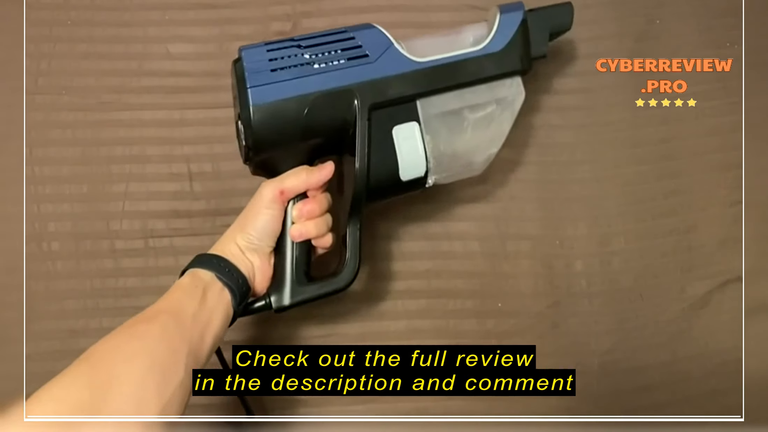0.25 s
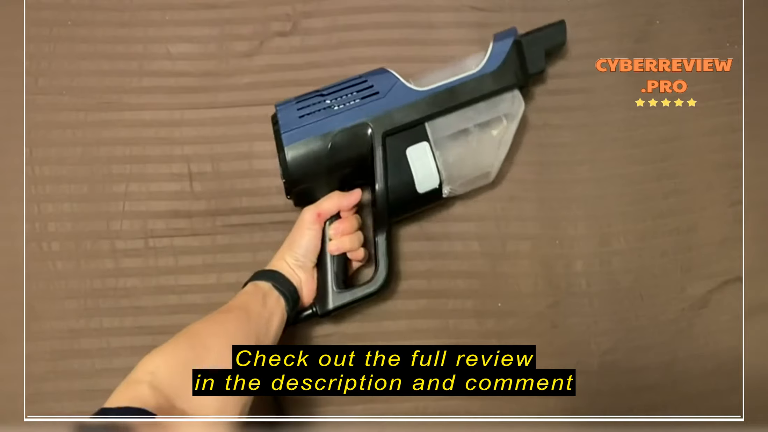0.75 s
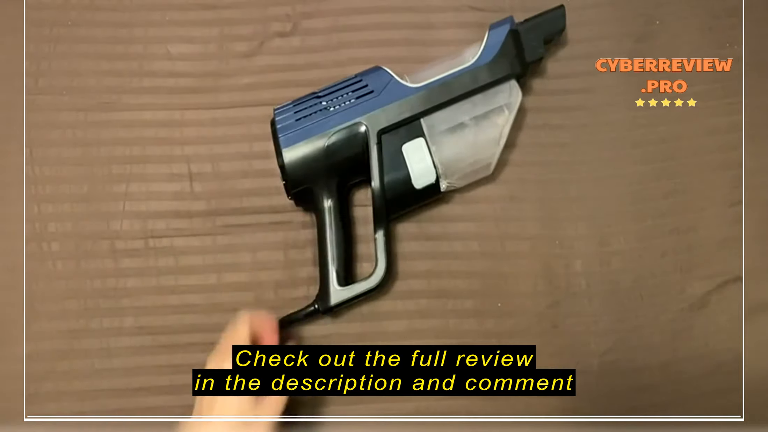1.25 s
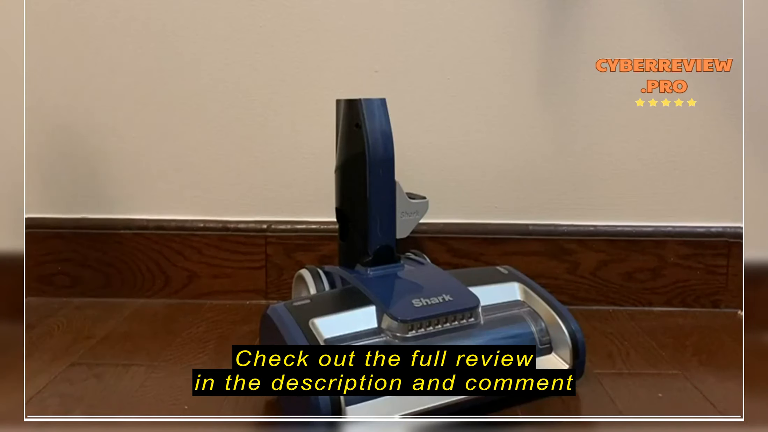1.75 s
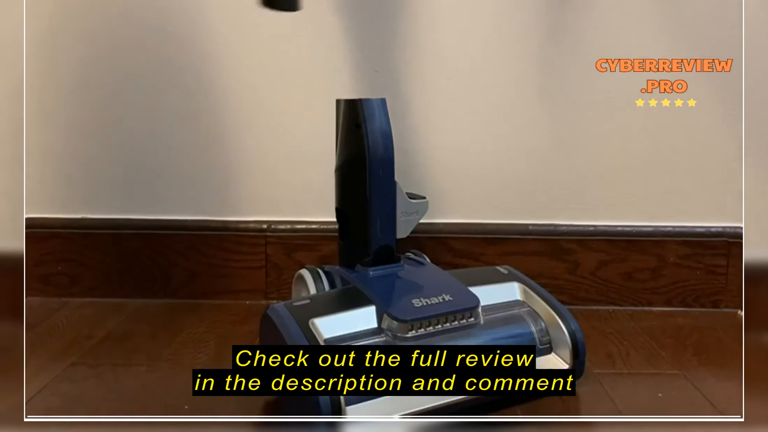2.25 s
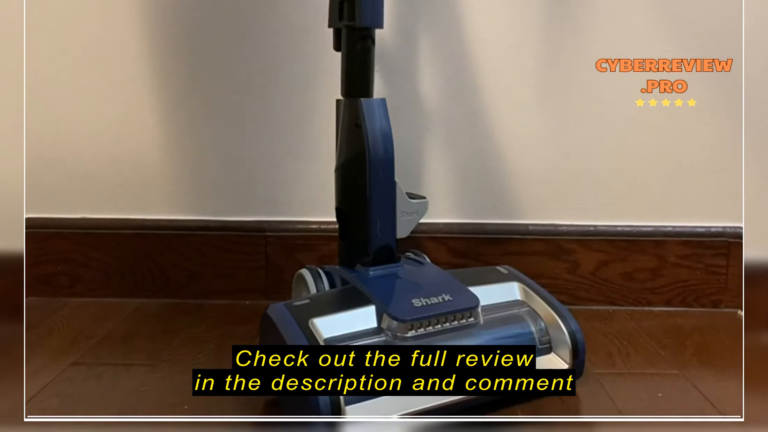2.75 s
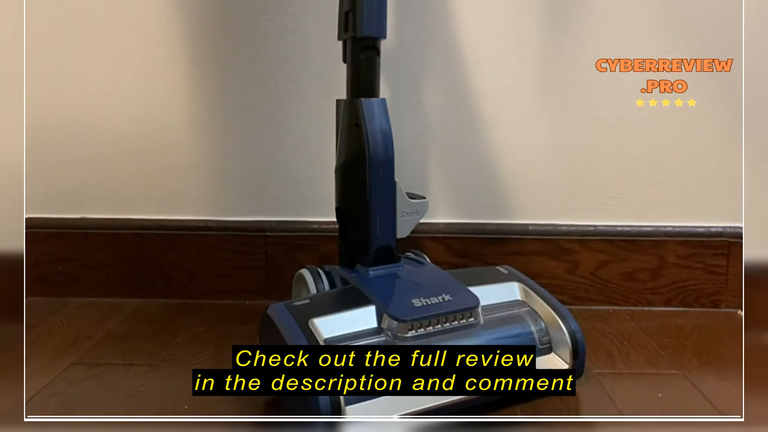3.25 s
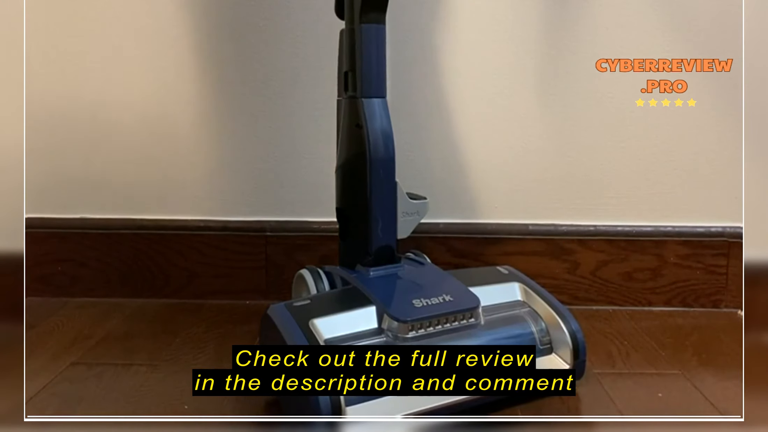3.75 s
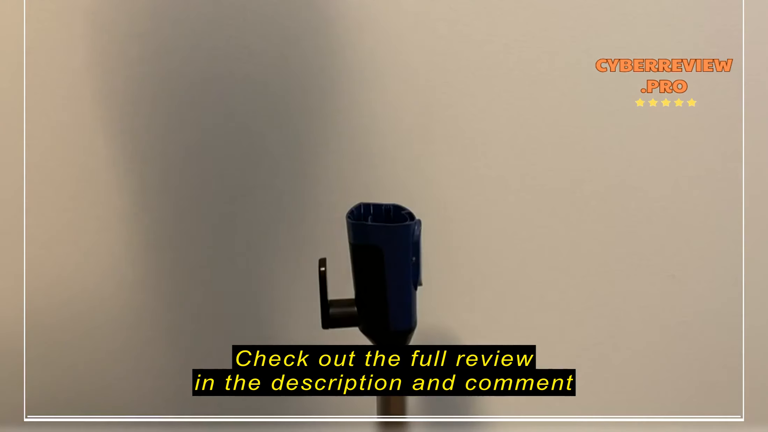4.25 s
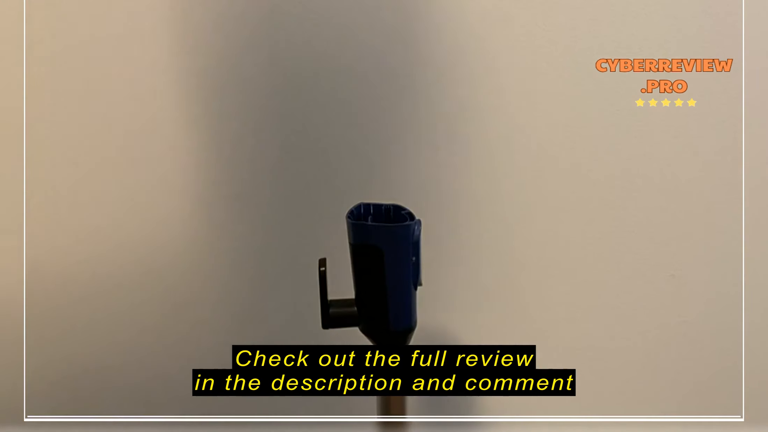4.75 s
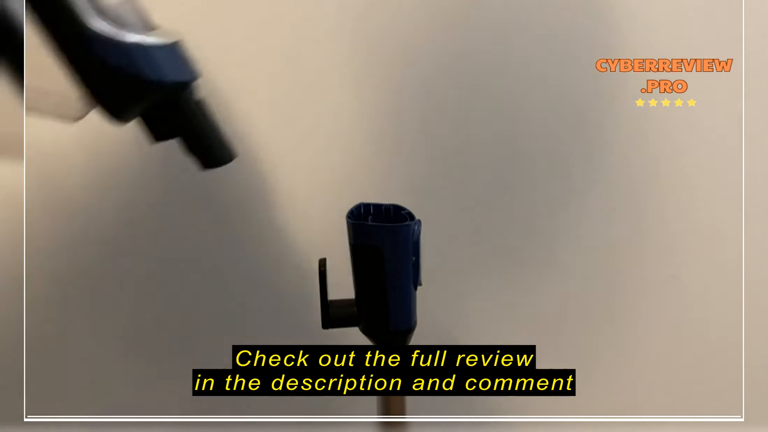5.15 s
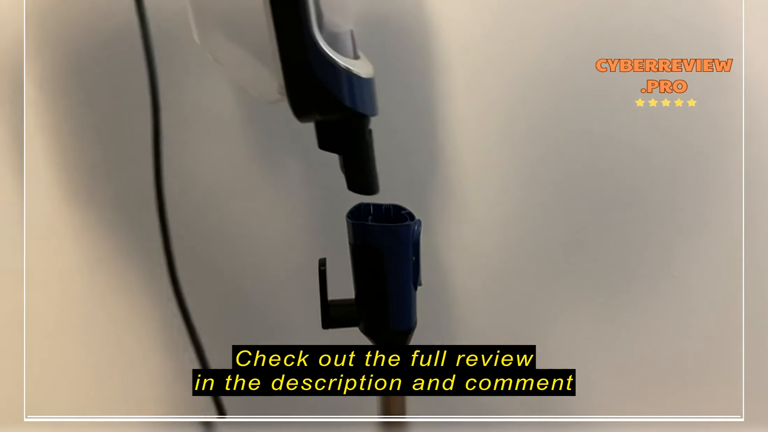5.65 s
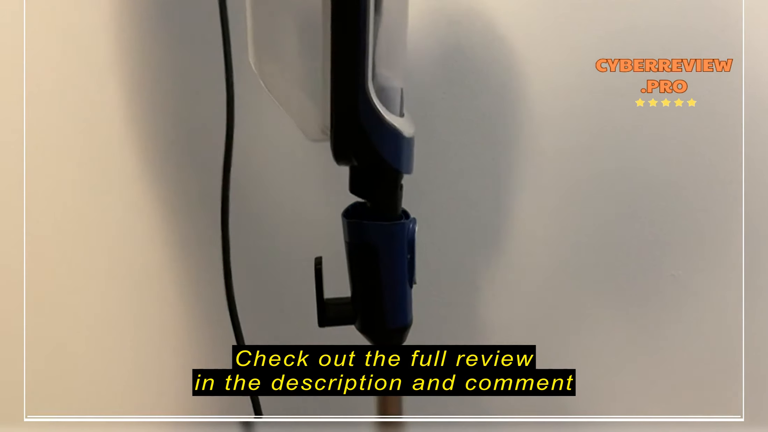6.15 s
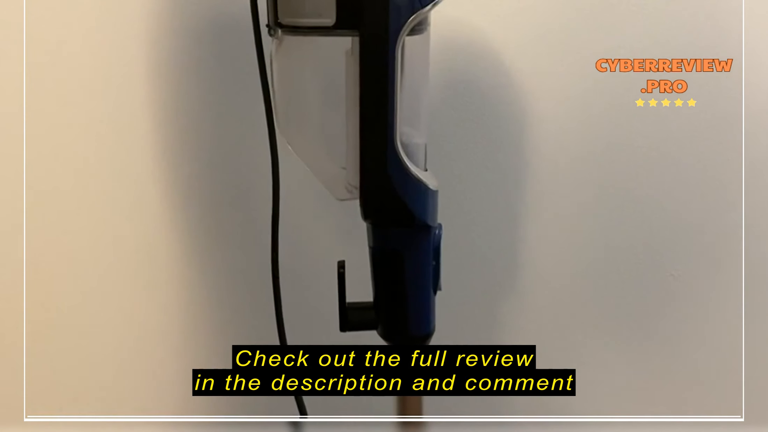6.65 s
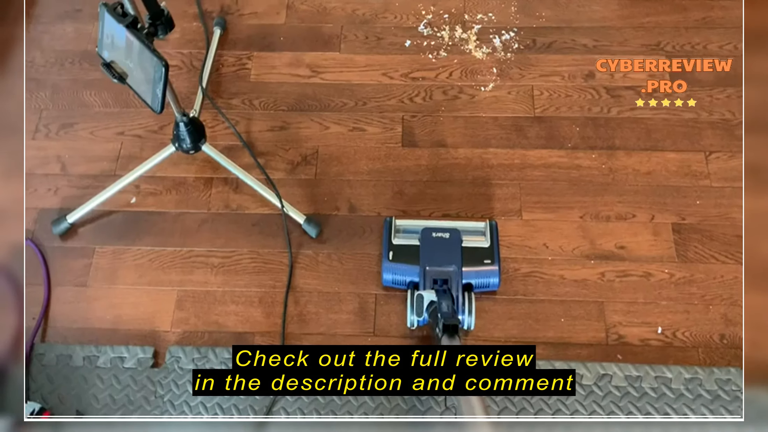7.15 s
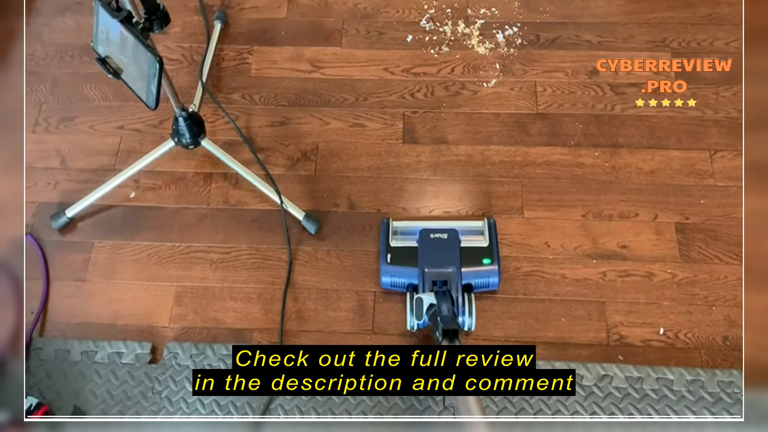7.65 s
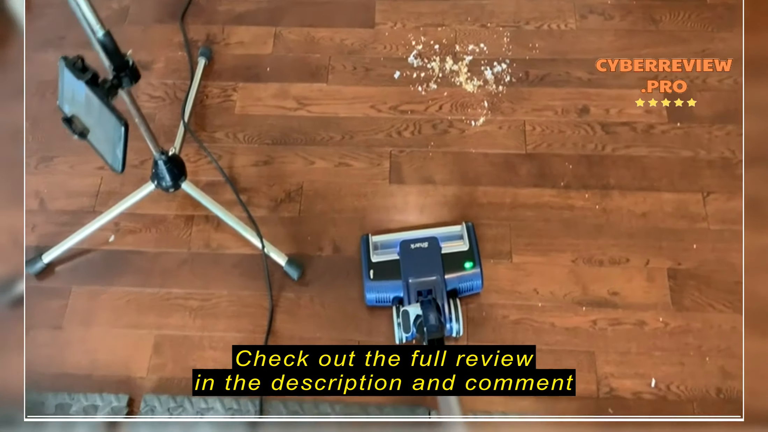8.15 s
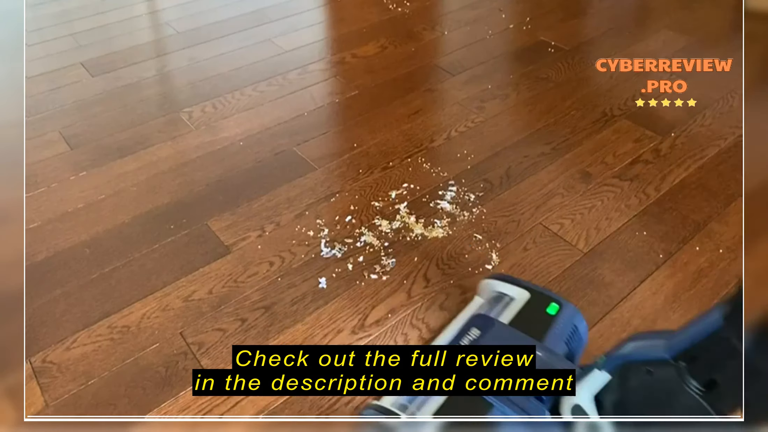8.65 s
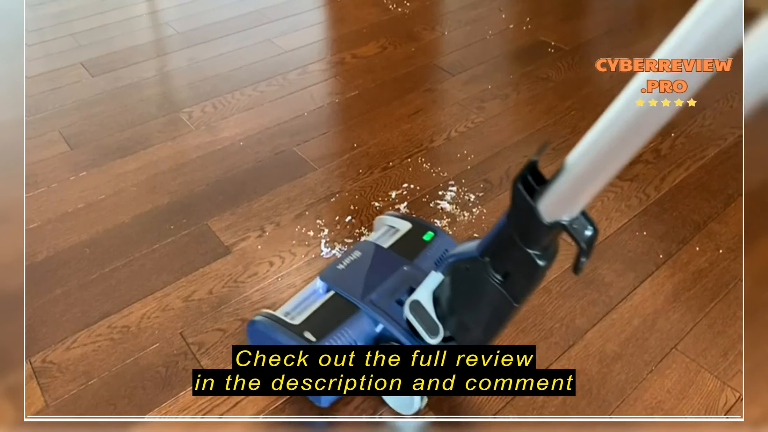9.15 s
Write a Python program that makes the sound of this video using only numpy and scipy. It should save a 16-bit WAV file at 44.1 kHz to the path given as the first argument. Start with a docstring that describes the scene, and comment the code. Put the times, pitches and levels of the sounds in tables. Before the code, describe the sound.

A small vacuum cleaner runs close to a stereo microphone in a hard-floored room, a steady airy roar with a thin whine. The switch clicks twice, and the motor glides down in pitch over a couple of seconds with rough brush noise. After faint rumbles and hand swishes, plastic parts clatter in two quick clusters, a piece bumps the floor, and a bright latch snap drags off into a short scrape.

```python
"""A hard-floored room, heard close up by a pair of microphone ports: a hand-held vacuum cleaner
runs, is switched off and coasts down. Its shaft gives sine tones, its fan noise through ducts,
its brushes noise through the housing. Then come low rumbles, hand swishes (swelling noise), narrow
noise swells, and plastic parts knocked and latched (cracks, ringing modes) with a room tail and hum."""
import sys
import numpy as np
from scipy import signal
from scipy.fft import rfft, irfft, next_fast_len
from scipy.io import wavfile
from scipy.ndimage import uniform_filter1d

SR = 44100
rng = np.random.default_rng(int(sys.argv[2]) if len(sys.argv) > 2 else 0)


def dump(signal):
    """Clip the signal to [-1, 1] and save it as 16-bit WAV at the path in sys.argv[1]."""
    limited = np.clip(np.atleast_2d(signal).T, -1, 1)
    pcm = np.round(limited * 32767).astype(np.int16)
    wavfile.write(sys.argv[1], SR, pcm)


N = 414099
SIZE = next_fast_len(N + SR)   # transform length, with space for the room tail
HZ = np.arange(SIZE // 2 + 1) * SR / SIZE


def amp(db):
    """Gain of a level in dB."""
    return 10 ** (np.asarray(db) / 20)


def in_time(rows, outside=None):
    """Columns of a curve table at every sample."""
    s, *columns = np.transpose(rows)
    return [np.interp(np.arange(N) / SR, s, c, outside, outside) for c in columns]


def at_hz(points, hz):
    """A spectrum table read on a log frequency axis."""
    table_hz, values = np.array(points).T
    return np.interp(np.log(hz + 1), np.log(table_hz + 1), values)


def peaks_db(peaks, hz):
    """Gain in dB of bell-shaped resonances."""
    return sum(db / (1 + (2 * (hz - top_hz) / width) ** 2) for top_hz, width, db in peaks)


def drift(rate, size=N):
    """Random wander: straight lines between normal knots, rate of them per second."""
    knots = rng.standard_normal(int(size / SR * rate) + 3)
    return np.interp(np.arange(size) / SR * rate, np.arange(len(knots)), knots)


def stereo_noise(gain, likeness, balance, lead=0):
    """Spectra of left and right noise, partly shared, left leading; rms 1 before the balance."""
    shared, own = rfft(rng.standard_normal((2, SIZE)))
    alike = np.clip(at_hz(likeness, HZ), 0, .998)
    right = alike * np.exp(-1j * lead) * shared + np.sqrt(1 - alike ** 2) * own
    side = amp(at_hz(balance, HZ) / 2)
    return gain / np.sqrt(np.mean(gain ** 2)) * np.array([shared * side, right / side])


# handling and room, left and right: f/Hz, likeness [0-1]
ROOM_LIKENESS = [(60, 0.89), (130, 0.93), (290, 0.64), (640, 0.21), (1410, 0.27), (3100, 0.23),
                 (6820, 0.13), (15000, 0.06)]
# left against right: f/Hz, level/dB
NEAR_BALANCE = [(60, -1), (180, 2.5), (550, 2.5), (1650, 2), (4970, 3.5), (15000, -2)]


def near_noise(colour_db):
    """Stereo noise shaped by a spectrum table, spread as handling and room are."""
    pair = stereo_noise(amp(at_hz(colour_db, HZ)), ROOM_LIKENESS, NEAR_BALANCE)
    return irfft(pair, SIZE)[:, :N]


def ring(clicks, hz, t60):
    """A damped resonator: a unit click starts a decaying sine of height 1."""
    r, w = amp(-60 / (t60 * SR)), 2 * np.pi * hz / SR
    return signal.lfilter([0, np.sin(w)], [1, -2 * r * np.cos(w), r * r], clicks + 1e-18)


SWITCH_OFF_S, FULL_SPEED = 2.745, 778.1   # s, turns per s
FRICTION, AIR_DRAG, DRAG_POWER = 93.2, 1016, 1.79   # turns/s lost each s: constant, by the fan at full speed
# quick and slow settling: speed lacking at first [turns per s], time constant [s]
SPIN_UP = [(19, .11), (6, .6)]


def shaft_speed():
    """Turns per second: settles under power, then friction and fan drag brake the rotor."""
    step, speed = .001, []   # s
    for s in np.arange(0, N / SR + step, step):
        if s < SWITCH_OFF_S:
            lacking = sum(gap * np.exp(-s / settle) for gap, settle in SPIN_UP)
            speed.append(FULL_SPEED - lacking)
        else:
            braking = FRICTION + AIR_DRAG * (speed[-1] / FULL_SPEED) ** DRAG_POWER
            speed.append(max(speed[-1] - step * braking, .01))
    return np.interp(np.arange(N) / SR / step, np.arange(len(speed)), speed)


# Tone levels below are those before the stereo gain and the wander.
# tones under power: t/s, then level/dB of each powered order
POWERED = [(0, -24, -33.5, -34, -41, -47), (.4, -24, -30, -33.5, -36.5, -49.5),
           (.62, -32, -30.5, -39, -37, -48), (1.0, -37, -33.5, -46, -35.5, -49.5),
           (1.6, -42.5, -34.5, -42, -33, -53.5), (2.1, -36.5, -38, -41, -32.5, -54.5),
           (2.748, -38, -38, -46.5, -32, -50.5)]
# powered orders [multiples of shaft speed]; the fan has 9 blades
POWERED_ORDERS = [1, 2, 3, 9, 12]
# weaker coasting orders [multiples of shaft speed]
COAST_ORDERS = [2.5, 4, 5, 7]
# one row per coasting order: level/dB at full speed off resonance,
# power of the speed it falls with, share of full speed where it dies out
COASTING = [(-50, 1.5, .38), (-45, 1.6, .25), (-55, 1.6, .18), (-51, 1.6, .12)]
# resonances where coasting orders swell or dip: f/Hz, width/Hz, level/dB
FLARES = [(680, 150, -15), (880, 110, 14), (1000, 60, -5), (1130, 120, 16), (1260, 90, 5), (1450, 200, -10)]
# strong coasting tones of rotor and fan: order, list of (f/Hz, level/dB) along the glide
WHINES = [(1, [(120, -120), (200, -72), (230, -59), (255, -49), (290, -44), (340, -50), (385, -58),
          (420, -50), (450, -42), (500, -35), (570, -46), (630, -38), (700, -32), (780, -38)]),
          (2, [(500, -120), (740, -66), (800, -39), (860, -33), (910, -42), (960, -52), (1120, -56),
          (1190, -40), (1260, -35), (1330, -45), (1560, -48)]), (3, [(500, -120), (770, -70), (820, -50),
          (880, -41), (980, -53), (1100, -44), (1250, -43), (1370, -57), (1480, -43), (1700, -43),
          (2330, -47)]), (9, [(1100, -120), (1550, -70), (1730, -60), (1900, -54), (2270, -52), (2480, -54),
          (2750, -44), (3000, -46), (3300, -48), (3800, -51), (4040, -60), (4500, -59), (5030, -51),
          (5700, -46), (6050, -46), (6500, -35), (7000, -34)]), (12, [(3500, -120), (4700, -72),
          (5300, -56), (6700, -57), (7600, -64), (9300, -60)]), (18, [(3500, -120), (4500, -78),
          (5000, -66), (5450, -52), (6000, -45), (6400, -47), (6800, -55), (7270, -49), (8060, -50),
          (9000, -56), (10000, -65), (14000, -78)])]
# faint high glides from the commutator bars: order, start t/s, end t/s, level/dB
GLIDES = [(44, 4.25, 4.75, -77), (66, 4.5, 5.25, -79)]
# phase between left and right channels; the top treble is opposite in the two: f/Hz, left leads [rad]
MOTOR_PHASE = [(0, 0), (250, -.4), (750, -1.7), (1120, -1.1), (1550, .3), (2500, .5), (3880, 1.8),
               (4220, 1.0), (5250, 5.6), (5510, 6.6), (6890, 7.4), (9300, 8.3), (10800, 9.42),
               (16000, 9.42)]
HOUSING_TOP_HZ, DIE_OUT_POWER = 1550, 12   # coasting orders roll off above this; steepness of dying out


def tone_levels(speed, on):
    """Pairs of order and gain: powered tones, then coasting tones following the falling speed."""
    size = len(speed)
    t, share = np.arange(size) / SR, speed / FULL_SPEED
    tones = [(order, on * amp(db[:size])) for order, db in zip(POWERED_ORDERS, in_time(POWERED))]
    flare_db = peaks_db(FLARES, HZ) - 20 * np.log10(1 + (HZ / HOUSING_TOP_HZ) ** 10)
    for order, (db, power, last) in zip(COAST_ORDERS, COASTING):
        resonant = amp(db + np.interp(order * speed, HZ, flare_db))
        dying = share ** power / (1 + (last / share) ** DIE_OUT_POWER)
        tones.append((order, ~on * resonant * dying))
    for order, levels in WHINES:
        tones.append((order, ~on * amp(at_hz(levels, order * speed))))
    for order, start, end, db in GLIDES:
        progress = np.clip((t - start) / (end - start), 0, 1)
        swell = np.sqrt(np.abs(np.sin(np.pi * progress)))
        tones.append((order, amp(db + 3.5 * drift(13, size)) * swell))
    return tones


def motor_tones(speed):
    """Sines on multiples of the shaft speed, wandering in level and phase, left leading right."""
    speed = speed[speed > 1]   # while it turns
    angle = 2 * np.pi * np.cumsum(speed) / SR
    on = np.arange(len(speed)) / SR < SWITCH_OFF_S
    out = np.zeros((2, N))
    for order, gain in tone_levels(speed, on):
        gain = uniform_filter1d(gain, size=600)
        heard = np.flatnonzero(gain > amp(-100))
        part, size = slice(heard[0], heard[-1] + 1), heard[-1] + 1 - heard[0]
        lead = np.interp(order * speed[part], *np.transpose(MOTOR_PHASE))
        wander_db = np.where(on[part], 1.5, 2.0) * drift(20, size) + .7 * drift(4, size)
        stereo_gain = 2 / np.sqrt(1.02 + .98 * np.cos(lead))   # makes up for phase loss in left + right
        phase = order * angle[part] + lead / 2 * [[1], [-1]] + .3 * drift(20, size)
        out[:, part] += gain[part] * amp(wander_db) * stereo_gain * np.sin(phase)
    return out


# air roar by range: f/Hz, fan level/dB at full speed, extra level/dB at first, power of the speed
# it falls with, share of full speed where it stalls, bearing level/dB at full speed
ROAR = [(118, -37, 1.5, 0.72, 0.36, -67), (366, -30.5, 0.5, 3.37, .12, -53),
        (1630, -30.5, 1.3, 2.25, 0.051, -62), (6000, -34.5, 3, 2.29, .06, -60.5)]
# colour of the air noise: f/Hz, level/dB per Hz
AIR = [(30, -24.5), (77, -8.5), (270, 0), (480, -3.5), (800, -5), (1200, -3), (1600, -12), (3000, -10),
       (4780, -12), (7000, -13), (9700, -17.5), (11000, -17), (15000, -33), (16000, -70.5)]
# duct resonances in the roar: f/Hz, width/Hz, level/dB
DUCTS = [(84, 30, 1.5), (121, 29, 5), (266, 30, 4), (420, 32, 3), (610, 50, 8), (686, 36, 9),
         (934, 50, 0.5), (1055, 21, 5), (1185, 30, 8), (1642, 40, 7.5), (1845, 690, 10), (2125, 160, 9.5),
         (3100, 120, 5), (6720, 830, 3)]
# ducts stop singing as the flow dies: start t/s, end t/s
DUCTS_FADE_S = (2.1, 5.1)
# motor noise, left and right: f/Hz, likeness [0-1]
MOTOR_LIKENESS = [(60, .995), (250, .92), (600, .75), (1500, .6), (4000, .7), (8000, .5), (10000, .7),
                  (11300, .997)]
# motor noise, left against right: f/Hz, level/dB
MOTOR_BALANCE = [(60, 0), (110, .5), (200, 2.5), (380, 5), (700, .5), (1290, -1.5), (2380, -2.5),
                 (4400, -1.5), (8120, -.5), (10500, 0)]
EXTRA_FADE_S, ROAR_LAG_S = .58, .064   # time constant of the first extra roar; the room holds the roar
STALL_POWER, BEARING_POWER = 4.8, .84   # steepness of the stall; bearing noise falls with this power


def air_roar(speed):
    """Turbulent air through the ducts, over bearing noise; each range falls as its own power of speed."""
    lead = np.interp(HZ, *np.transpose(MOTOR_PHASE))
    pair = stereo_noise(amp(at_hz(AIR, HZ)), MOTOR_LIKENESS, MOTOR_BALANCE, lead)
    t, out = np.arange(N) / SR, 0
    singing = np.interp(t, DUCTS_FADE_S, [1, 0])
    flow = np.interp(t - ROAR_LAG_S, t, speed) / FULL_SPEED
    ducts = amp(peaks_db(DUCTS, HZ))
    for k, (_, fan_db, extra_db, power, stall, bearing_db) in enumerate(ROAR):
        # the ranges crossfade on a log axis
        share = np.interp(np.log(HZ + 1), np.log(np.array(ROAR)[:, 0]), np.eye(4)[k])
        plain, ducted = (irfft(pair * share * colour, SIZE)[:, :N] for colour in (1, ducts))
        plain = plain / plain.mean(axis=0).std()
        ducted = ducted / ducted.mean(axis=0).std()
        band = singing * ducted + (1 - singing) * plain
        fan = amp(fan_db + extra_db * np.exp(-t / EXTRA_FADE_S)) * flow ** power
        fan = fan / (1 + (stall / flow) ** STALL_POWER)
        bearing = amp(bearing_db) * flow ** BEARING_POWER
        out = out + np.hypot(fan, bearing) * amp(0.96 * drift(12)) * band
    return out


# housing resonances: f/Hz, width/Hz, level/dB of the gain for brush noise
HOUSING = [(280, 71, 5.5), (400, 77, -7), (487, 74, 2.5), (653, 53, -0.5), (683, 43, 18.5),
           (870, 110, 18.5), (1125, 140, 22), (1263, 58, -5), (1640, 410, 10), (2550, 650, 15),
           (3110, 890, -3), (4396, 1000, 3.5), (5730, 4500, -0.5), (12250, 4800, -8)]
# brushes rubbing as the rotor slows: t/s, level/dB
BRUSHES = [(2.7, -74), (3.2, -48), (3.7, -45), (4.2, -51), (4.6, -55.5), (4.9, -59.5), (5.2, -68),
           (5.5, -101)]


def brushes():
    """Rubbing noise coloured by the motor housing's resonances."""
    colour = amp(peaks_db(HOUSING, HZ)) * (HZ > 220) / (1 + (HZ / 6000) ** 4)
    noise = irfft(stereo_noise(colour, ROOM_LIKENESS, MOTOR_BALANCE), SIZE)[:, :N]
    return amp(in_time(BRUSHES, outside=-120)[0] + drift(13.0)) * noise


# blows, levels before the offsets below: t/s, crack level/dB, shell level/dB, body level/dB,
# floor boom level/dB, brightness [dB per octave above 600 Hz]
BLOWS = [(2.4145, -4.5, -48, -34.5, -60.5, 0), (2.7415, -13, -32, -42.5, -62, 0),
         (4.8038, -43, -48, -64, -65, 3), (5.723, -66, -60, -76, -70, 8.5), (5.7723, -75, -70, -48, -49, 2),
         (7.091, -25, -31, -15.5, -64, 2), (7.0971, -35, -24.5, -40, -49, 0.7),
         (7.1086, -15, -13, -15, -45, 0.8), (7.1175, -32, -31, -19, -47, .1),
         (7.134, -49.5, -25, -18.5, -54, .1), (7.1446, -32, -26, -25, -54, 4.5),
         (7.407, -34.5, -37, -25, -54, -4), (7.4192, -34, -30, -28, -25.5, 0),
         (7.4273, -20, -27.5, -23, -34.5, 5), (7.4409, -30, -23, -15.5, -39, 2),
         (7.451, -48, -23, -32, -28.5, -5), (7.639, -45.5, -56, -55.5, -57, .1),
         (8.0285, -25, -36, -45, -60, 0), (8.0315, -22, -20, -18, -60, 0), (8.045, -48, -30, -28, -18, -1),
         (8.4716, -16, -35, -34, -60, 2), (8.474, -6, -35, -40, -60, 2), (8.4765, -9, -32, -19, -36.5, -6),
         (9.3485, -58.5, -52, -79, -90, 3)]
# thin shell modes: f/Hz, level/dB
SHELL = [(620, 5), (740, 2.5), (850, 3), (980, 1), (1180, 1.5), (1380, -3.5), (1540, 0), (1700, 9),
         (1810, 8), (1950, -1), (2200, -5), (2500, -6.5), (2900, -14), (3400, -10)]
# body modes: f/Hz, level/dB, t60/s
BODY = [(151.7, -8, 0.17), (180.2, -8.5, 0.1), (233, -4, 0.079), (273.3, -2, 0.072), (374, -0.5, 0.039),
        (478, 0, 0.02)]
# floor boom modes: f/Hz, level/dB, t60/s
BOOM = [(80, 0, 0.65), (91, -2, .33), (130, -6, 0.15)]
# colour of the crack: f/Hz, level/dB per Hz
CRACK = [(1500, -13), (2500, -4), (5000, -7), (7000, -13), (10000, -18.5), (16000, -25)]
CRACK_RISE_S, CRACK_T60_S = .0012, .009
SHELL_CYCLES = 8   # cycles a shell mode rings while falling 60 dB


def cracks(at, crack_db):
    """Short noise bursts close by; the room hears each as one even pulse."""
    clicks = np.zeros(N)
    clicks[at] = amp(crack_db - 8.5)
    fall = amp(-60 / (CRACK_T60_S * SR))
    rise = np.exp(-1 / (CRACK_RISE_S * SR))
    envelope = signal.lfilter([1 - rise], np.convolve([1, -fall], [1, -rise]), clicks + 1e-18)
    pulses = clicks * np.sqrt(np.sum(envelope ** 2) / np.sum(clicks ** 2))   # same energy in all
    near_and_far = [envelope * rng.standard_normal(N), pulses]
    colour = amp(at_hz(CRACK, HZ))
    colour = colour / np.sqrt(np.mean(colour ** 2))
    return irfft(rfft(near_and_far, SIZE) * colour, SIZE)[:, :N]


def blows():
    """Each blow cracks and strikes every mode with a random strength; near sound and room feed."""
    s, crack_db, *part_db, bright = np.transpose(BLOWS)
    at = np.round(s * SR).astype(int)
    out = cracks(at, crack_db)
    shell = [(hz, db, SHELL_CYCLES / hz) for hz, db in SHELL]
    softness_of_each = (.6, .93, .98)
    airborne_of_each = (.55, 1, .1)   # the floor boom hardly enters the air
    parts = zip((shell, BODY, BOOM), part_db, softness_of_each, airborne_of_each)
    for modes, db, softness, airborne in parts:
        luck = rng.standard_normal((len(at), len(modes)))
        rings = 0
        for k, (hz, level_db, t60) in enumerate(modes):
            tilt_db = bright * np.log2(max(hz, 600) / 600)
            clicks = np.zeros(N)
            clicks[at] = amp(db + level_db - 4 + 2.5 * luck[:, k] + tilt_db) * (-1) ** k
            rings = rings + ring(clicks, hz, t60)
        dulled = signal.lfilter([1 - softness], [1, -softness], rings)   # a yielding contact dulls the onset
        out += [[1], [airborne]] * dulled
    return out


# weight landing on the boards, before the stereo gain: t/s, f/Hz, level/dB of the strike, t60/s
THUDS = [(8.0365, 165, -17, .04), (8.4765, 205, -12, .03)]


def thuds():
    """The cleaner's weight lands: heavily damped low swings, pushing downward first."""
    out = np.zeros(N)
    for s, hz, db, t60 in THUDS:
        click = np.zeros(N)
        click[int(s * SR)] = -amp(db)
        out += ring(click, hz, t60)
    return out


# low rumbles, then hand swishes:
# t/s, hold/s, hiss level/dB, rumble level/dB, rise [dB per s], fall [dB per s]
STROKES = [(4.8, 0.18, -95, -62.5, 64, 49), (5.3, .35, -95, -72.5, 60, 60),
           (5.77, 0.015, -69, -60, 317, 84), (5.86, .01, -58, -62.5, 64, 113),
           (5.985, 0.069, -51.5, -82, 190, 90), (6.15, 0.0071, -38, -73, 118, 145),
           (6.39, 0.022, -44, -80, 400, 110), (6.445, 0.023, -37.5, -71, 197, 133),
           (6.636, 0.011, -60, -60.5, 79, 145), (6.75, 0.15, -75, -80, 100, 60),
           (7.04, .01, -78, -66, 69, 300)]
# cleaner over the floor: the same columns
DRAGS = [(7.9, 0.026, -85, -55, 900, 61), (8.005, 0.018, -56, -52.5, 172, 1490),
         (8.473, 0.0011, -23, -40, 1620, 900), (8.49, 0.037, -31.5, -46, 1500, 130),
         (8.58, 0.14, -38.5, -48, 399, 89), (8.96, 0.012, -58, -55, 153.5, 96),
         (9.08, 0.06, -75, -71, 150, 1150), (9.35, .04, -76.5, -70, 1500, 60)]
# colour of the hand's swish: f/Hz, level/dB per Hz
SWISH = [(290, -55), (500, -53), (1200, -36), (1550, -19.5), (2420, -10.5), (3500, -13), (4400, -11.5),
         (5400, -11), (6740, -11.5), (10400, -10.5), (13900, -13.5), (15800, -2)]
# colour of plastic on floor: f/Hz, level/dB per Hz
DRAG = [(240, -39.5), (400, -5.5), (2040, -2), (6380, -2.5), (10800, -14), (14400, -23.5), (15800, -29)]
# colour of the low rumble: f/Hz, level/dB per Hz
RUMBLE = [(18, -33), (30, -29.5), (76, -1), (108, -10.5), (257, -10.5), (297, -11), (461, -15.5),
          (900, -29.5), (1170, -61), (1980, -120)]
GRAIN_DB, GRAINS_PER_S = 1.3, 260   # roughness of the hiss


def rumbles_and_slides():
    """Noise that swells, holds and dies: low rumbles, then hand swishes, then drags on the floor."""
    swish, drag, rumble = (near_noise(colour) for colour in (SWISH, DRAG, RUMBLE))
    out, t = 0, np.arange(N) / SR
    for rows, hiss in ((STROKES, swish), (DRAGS, drag)):
        power = np.zeros((2, N))   # hiss, rumble
        for s, hold, hiss_db, rumble_db, rise, fall in rows:
            slope_db = np.minimum(rise * (t - s), fall * (s + hold - t))
            power += amp([[hiss_db], [rumble_db]]) ** 2 * amp(2 * np.minimum(slope_db, 0))
        hiss_level, rumble_level = np.sqrt(power)
        out = out + hiss_level * amp(GRAIN_DB * drift(GRAINS_PER_S)) * hiss
        out = out + rumble_level * amp(2.4 * drift(25)) * rumble
    return out


# short swells of narrow noise, the last a faint high chirp just before the latch;
# level before the noises are summed: t/s, length/s, f/Hz, width/Hz, level/dB
NARROW_SWELLS = [(5.84, .12, 6550, 150, -73), (5.93, .13, 1900, 900, -70), (6.1, .12, 2700, 700, -61),
                 (6.37, .15, 2450, 220, -58), (6.4, .1, 6500, 900, -59), (8.454, .024, 6600, 120, -46)]


def narrow_swells():
    """Short swells of narrow noise, partly different left and right."""
    out = np.zeros((2, N))
    for s, length, hz, width, db in NARROW_SWELLS:
        start, size = int(s * SR), int(length * SR)
        angle = 2 * np.pi * hz * np.arange(size) / SR
        shared, *own = (drift(width, size) * np.sin(angle) + drift(width, size) * np.cos(angle)
                        for _ in range(3))
        swell = np.sqrt(np.hanning(size))
        out[:, start:start + size] += amp(db) * swell * (shared + np.array(own))
    return out


# decay of the room: f/Hz, t60/s
ROOM_T60 = [(60, 0.68), (250, 0.63), (1000, 0.58), (4000, 0.67), (15000, 0.13)]
# room energy against direct: f/Hz, level/dB
ROOM_DB = [(60, 3.5), (160, -0.5), (300, -3.5), (600, 2.5), (1000, 14.5), (1400, 7.5), (1900, 11.5),
           (4000, 4.5), (15000, 12.5)]
EARLY_DB, EARLY_T60_S = 8.5, 0.046   # first reflections stand above the tail


def room(x):
    """Echo tail: stereo noise that dies band by band."""
    t = np.arange(SR) / SR
    white = stereo_noise(np.ones(len(HZ)), ROOM_LIKENESS, NEAR_BALANCE)
    noise = rfft(irfft(white, SIZE)[:, :SR])
    centres, tail = 40 * 2. ** np.arange(0, 8.6, .5), 0   # half-octave bands
    log_hz = np.log(np.arange(SR // 2 + 1) + 1)
    for k, hz in enumerate(centres):
        share = np.interp(log_hz, np.log(centres), np.eye(len(centres))[k])
        decay = amp(-60 * t / at_hz(ROOM_T60, hz)) + amp(EARLY_DB - 60 * t / EARLY_T60_S)
        decay = decay * np.clip(t / 0.0021, 0, 1)
        gain = amp(at_hz(ROOM_DB, hz)) / np.sqrt(np.sum(decay ** 2))
        tail = tail + gain * decay * irfft(noise * share, SR)
    return irfft(rfft(x, SIZE) * rfft(tail, SIZE), SIZE)[:, :N]


# colour of the room's hum: f/Hz, level/dB per Hz
FLOOR = [(15, -49), (25, -7), (70, 1.5), (137, -10.5), (269, -8.5), (560, -18.5), (981, -22.5),
         (3990, -27.5), (7630, -33.5), (8490, -43), (9990, -37.5), (15800, -68)]
FLOOR_DB = -64.5


def room_hum():
    """Steady, mostly low noise of the quiet room."""
    return amp(FLOOR_DB) * near_noise(FLOOR)


# switch clicked close by, later knocks fill the room: t/s, level/dB sent to the room
ROOM_SEND = [(0, -15), (4.0, -15), (4.5, 0)]


def scene():
    """Motor, handling, room and its quiet hum."""
    speed = shaft_speed()
    motor = motor_tones(speed) + air_roar(speed) + brushes()
    knocks, far = blows()
    struck = (knocks + thuds()) * amp([[1.3], [-1.3]])   # dB; left is louder
    handling = struck + rumbles_and_slides() + narrow_swells()
    echo = room(far * amp(in_time(ROOM_SEND)[0]))
    return motor + handling + echo + room_hum()


CUTOFF_HZ = 15900
GATE_FROM_HZ, GATE_BELOW_DB, GATE_DEPTH_DB = 600, -71, 10
GATE_WINDOW = 1200   # samples


def record(dry):
    """The microphone loses the deepest bass, a gate dips the faintest treble; the top is cut."""
    dry = signal.sosfilt(signal.butter(2, 50, "high", fs=SR, output="sos"), dry)
    treble_filter = signal.butter(2, GATE_FROM_HZ, "high", fs=SR, output="sos")
    treble = signal.sosfiltfilt(treble_filter, dry)
    power = np.abs(uniform_filter1d(np.mean(treble ** 2, axis=0), size=GATE_WINDOW))
    dip_db = -GATE_DEPTH_DB / (1 + (power / amp(GATE_BELOW_DB) ** 2) ** 8)
    dry = dry - treble * (1 - amp(dip_db))
    return signal.sosfilt(signal.cheby2(12, 70, CUTOFF_HZ + 300, fs=SR, output="sos"), dry)


dry = scene()
out = record(dry)
dump(out)
```